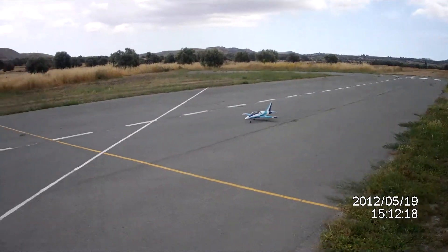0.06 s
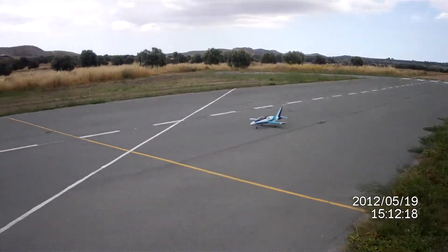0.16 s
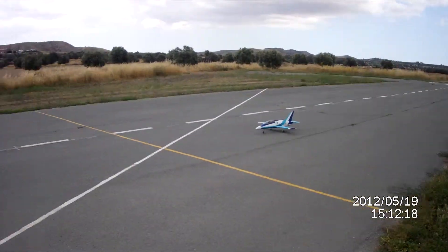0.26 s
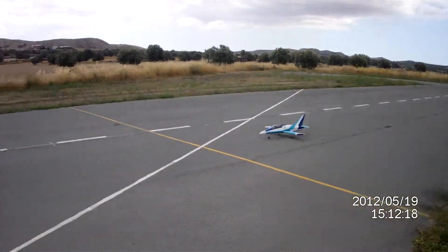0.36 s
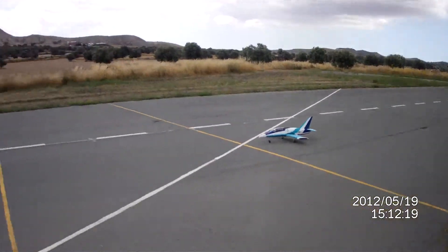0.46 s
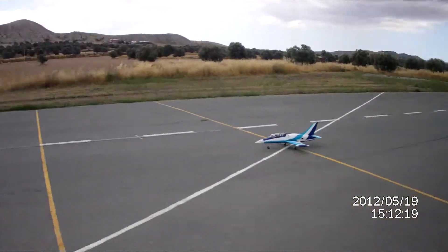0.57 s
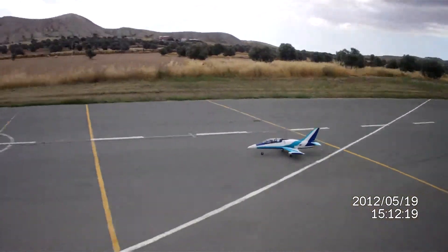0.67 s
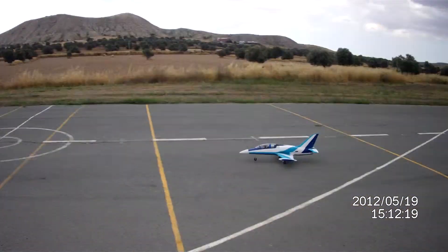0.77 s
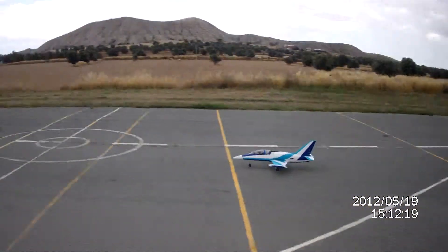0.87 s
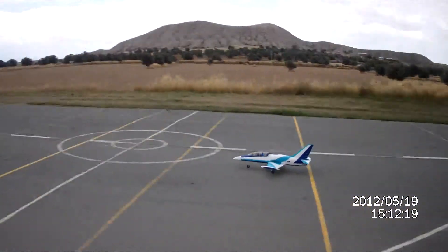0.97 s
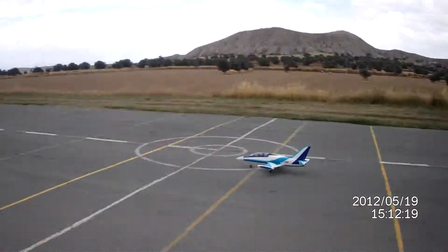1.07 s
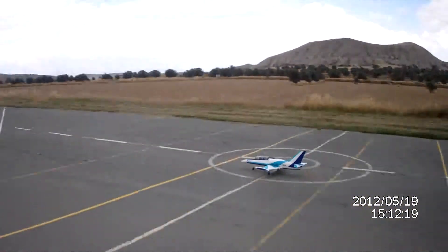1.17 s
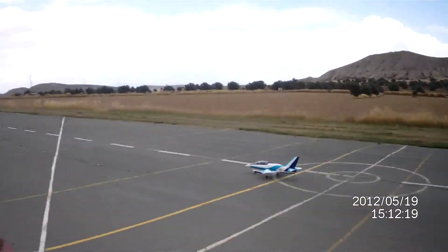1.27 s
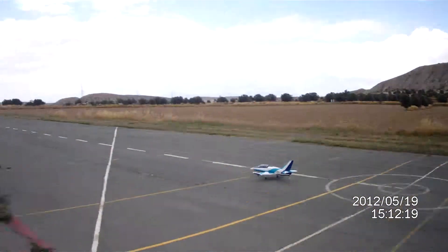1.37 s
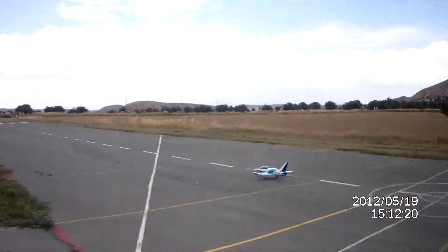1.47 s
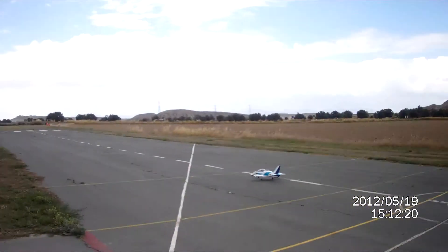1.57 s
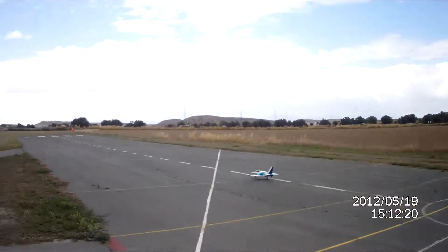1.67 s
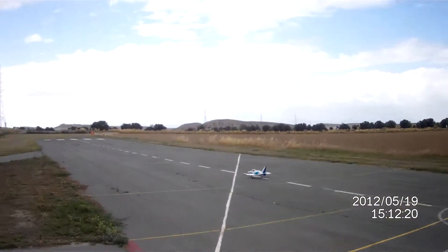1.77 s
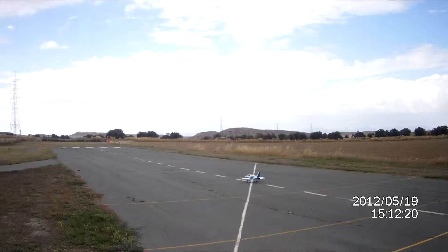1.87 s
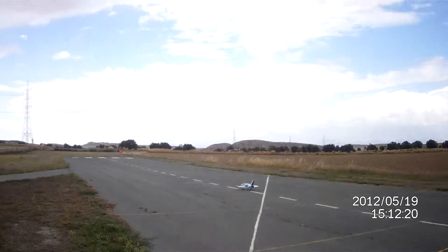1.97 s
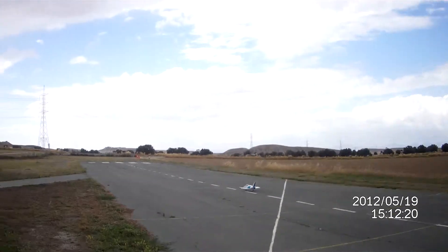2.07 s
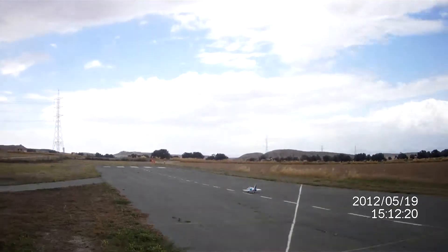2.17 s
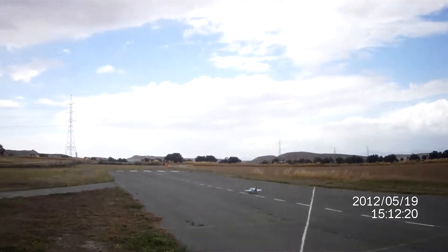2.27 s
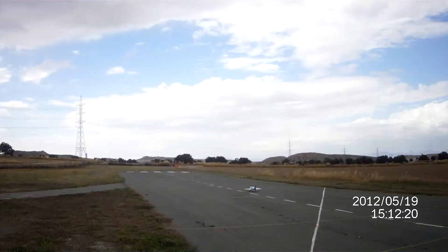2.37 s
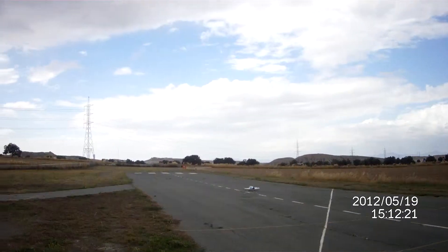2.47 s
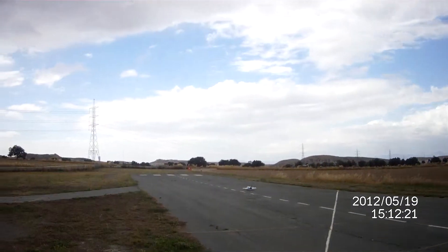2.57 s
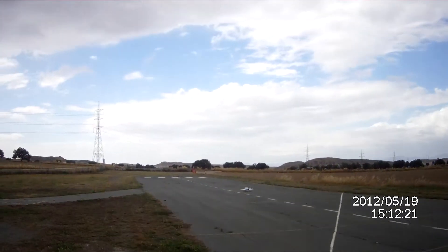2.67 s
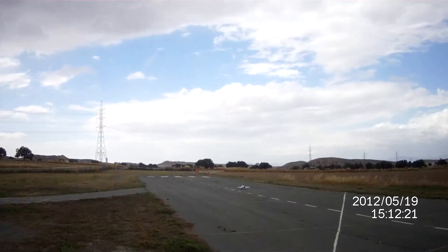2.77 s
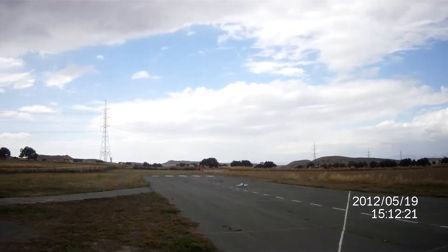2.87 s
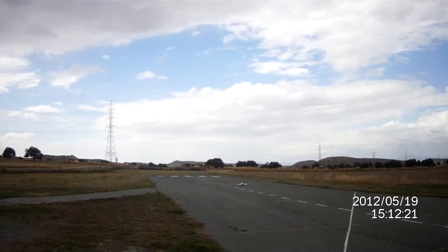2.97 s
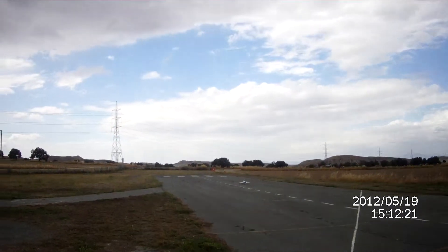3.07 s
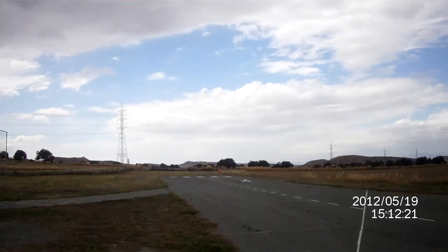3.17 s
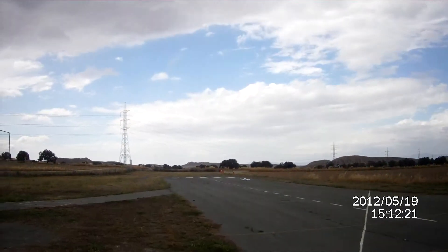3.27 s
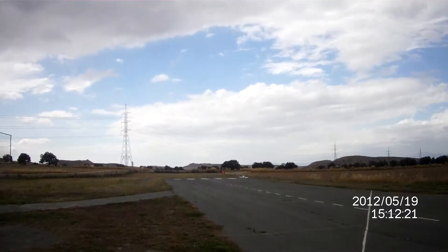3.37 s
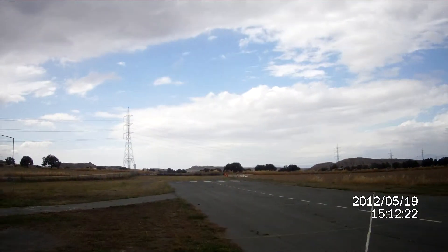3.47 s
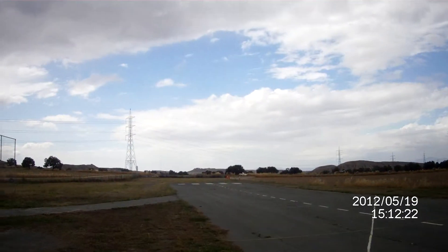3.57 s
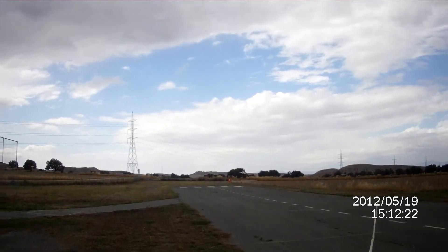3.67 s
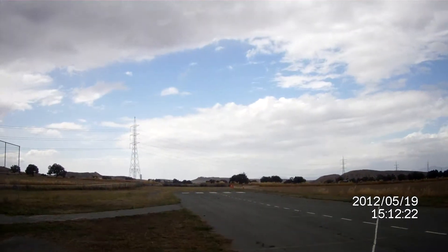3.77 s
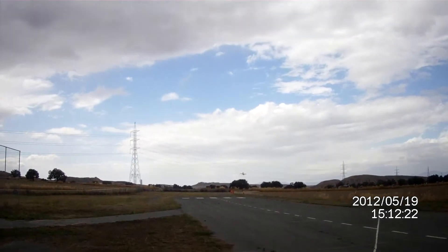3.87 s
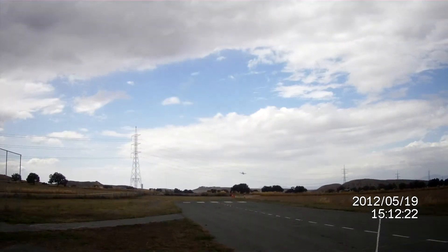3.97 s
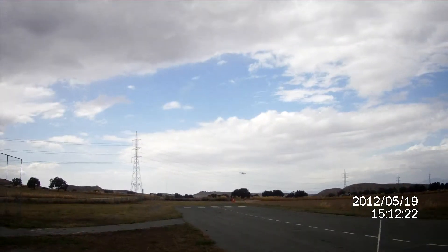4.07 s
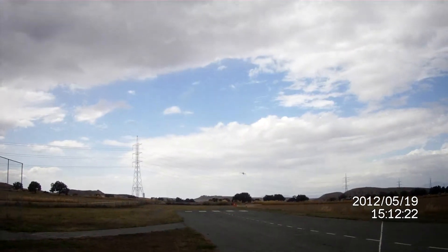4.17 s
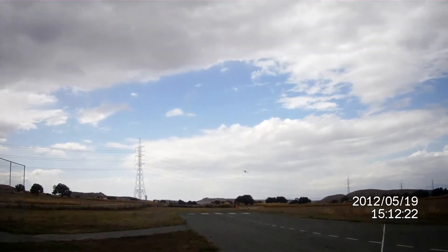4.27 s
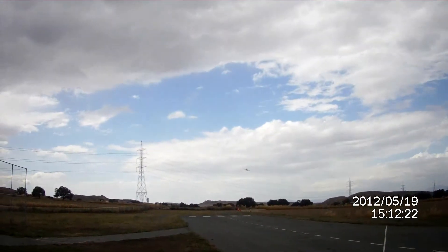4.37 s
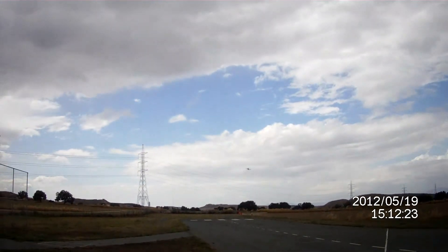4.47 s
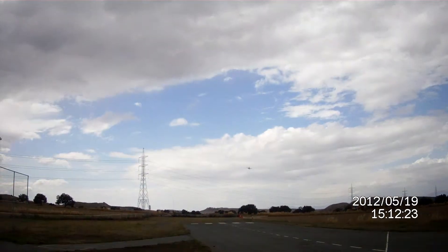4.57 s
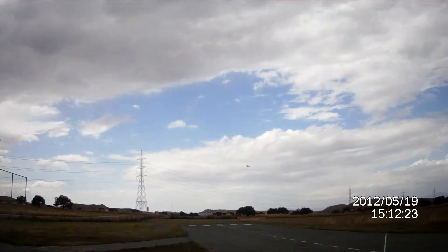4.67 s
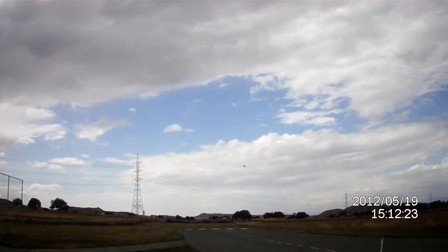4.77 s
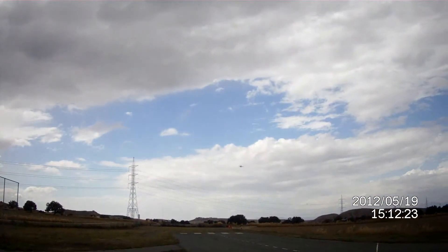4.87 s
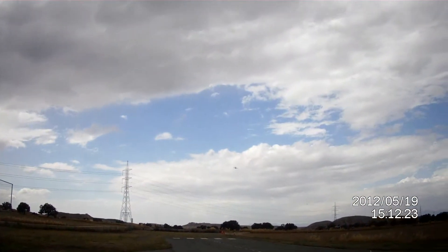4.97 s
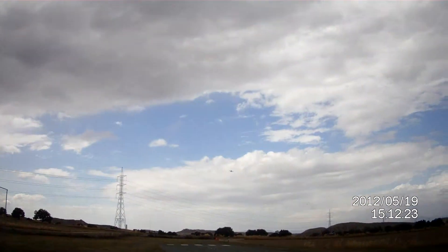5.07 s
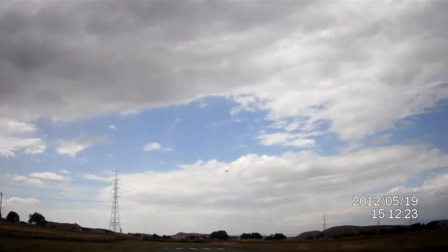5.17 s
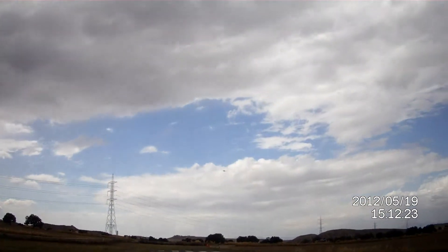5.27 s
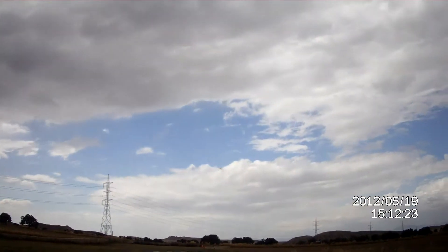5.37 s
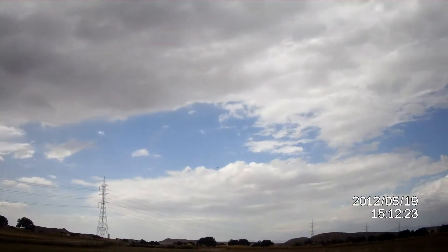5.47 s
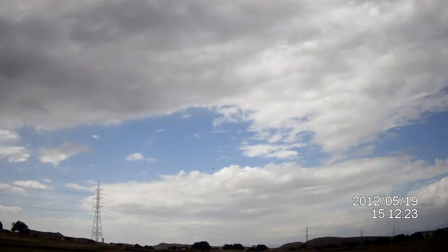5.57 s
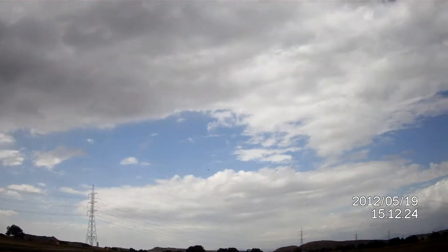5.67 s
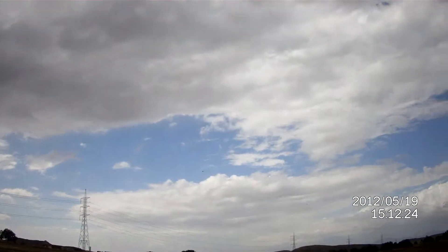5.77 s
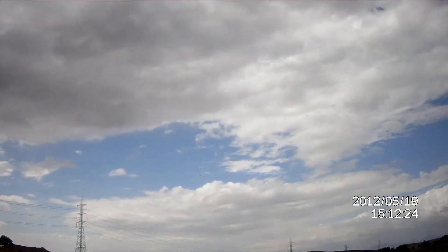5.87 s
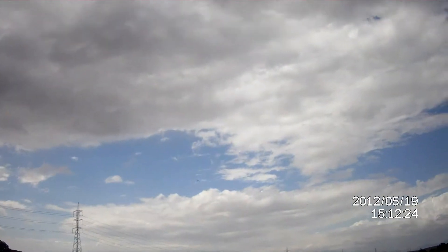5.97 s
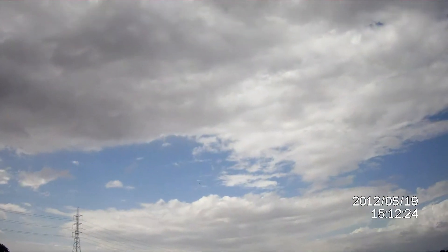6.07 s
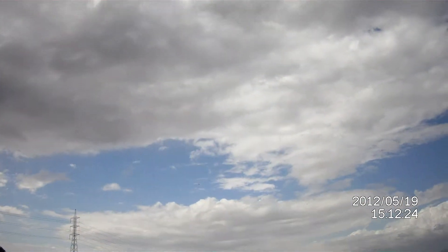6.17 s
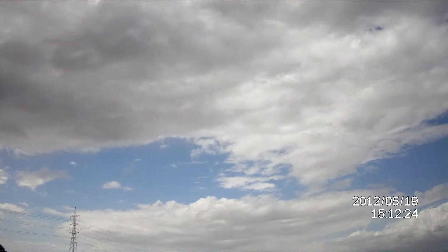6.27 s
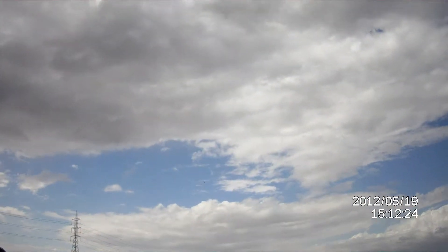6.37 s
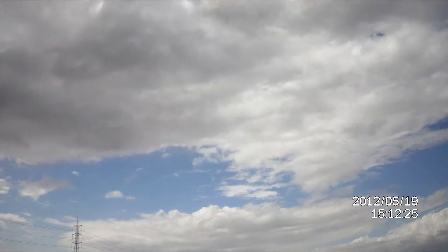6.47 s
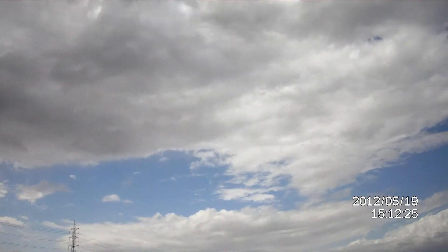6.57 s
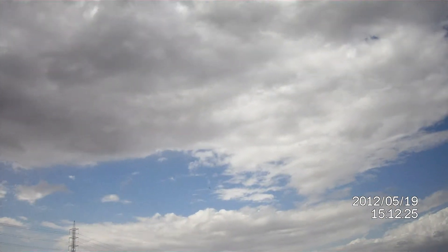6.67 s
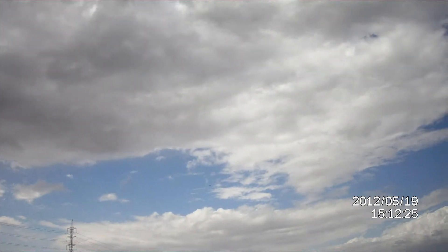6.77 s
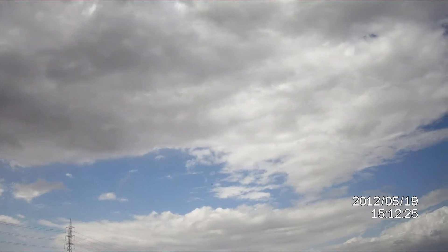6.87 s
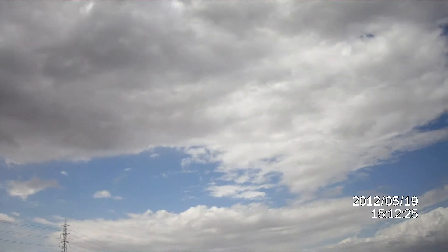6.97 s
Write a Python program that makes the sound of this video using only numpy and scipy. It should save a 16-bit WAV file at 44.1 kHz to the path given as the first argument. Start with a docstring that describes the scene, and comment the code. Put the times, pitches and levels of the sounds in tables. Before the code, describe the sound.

Outdoors on an open airfield, a shrill multi-toned fan whistle over breathy exhaust roar spools up and passes near the microphone around one second. Two small wheel clicks follow just before two seconds. The jet recedes, its treble hissing and flickering, then climbs away as a thin, wavering whine. Mono hand-held sound, with faint camera flutter and dull scuffs late on.

```python
"""Model jet take-off

A model jet with a five-blade electric ducted fan spools up, rolls past on tarmac, lifts off and climbs away.
Shaft-locked tones and shaped noise leave the duct in beams that sweep past as the flight angle changes.
A delayed copy off the ground combs the sound, lagging more with height; the side of the field echoes faintly.
The hand-held mono camera ticks faintly once per frame and is bumped a few times; knocks are noise bursts."""
import sys
import numpy as np
from scipy import signal
from scipy.fft import rfft, irfft, next_fast_len
from scipy.io import wavfile
from scipy.ndimage import uniform_filter1d, map_coordinates

SR = 44100
rng = np.random.default_rng(int(sys.argv[2]) if len(sys.argv) > 2 else 0)


def output_pcm(signal):
    """Save a mono or channel-first signal as 16-bit PCM at the path in sys.argv[1].

    Samples are clipped to [-1, 1] before scaling.
    """
    pcm = np.clip(np.atleast_2d(signal).T, -1, 1) * 32767
    wavfile.write(sys.argv[1], SR, np.round(pcm).astype(np.int16))


N = 309582

# Fan speed as heard, Doppler shift included: time_s, shaft_hz
FAN_SPEED = [(0, 731), (0.2, 730), (0.3, 737.6), (0.4, 758), (0.44, 776), (0.5, 839), (0.55, 905),
             (0.59, 916.2), (0.75, 912), (1, 900), (1.17, 890), (1.56, 874.8), (1.8, 869), (2.3, 859.8),
             (3.15, 851.5), (3.6, 848.3), (5.4, 844.4), (7.02, 846.3)]
# Lines from unequal blades, before the duct rush beam: shaft_multiple, level_db
UNEVEN_BLADES = [(2, -22), (3, -13.5), (4, -20.5), (6, -21.5), (7, -43), (8, -16.5), (9, -21), (11, -38),
                 (12, -42), (20, -6)]
# Noise spectra, scaled to rms 1 in use: freq_hz, relative_level_db
# exhaust roar
ROAR_SPECTRUM = [(100, -35), (200, -21), (330, -19.5), (440, -8.5), (600, 0.5), (760, 1), (950, -5),
                 (1150, -13), (1600, -22.5), (2200, -29), (4000, -39)]
# deep part of the exhaust, heard only close by
NEAR_ROAR_SPECTRUM = [(130, -35), (240, -5.5), (350, -8.5), (520, 0), (700, 0.5), (1000, -46),
                      (1400, -11.5), (2200, -25.5)]
# rush in the duct
RUSH_SPECTRUM = [(700, -10.5), (1300, -4), (1800, -7.5), (2150, -5), (2600, 2), (3150, 0.5), (3700, -11),
                 (4350, -2.5), (4900, -13), (5600, -7), (6300, -14.5), (7500, -21), (12000, -44)]
# turbulence around the blade tone
TURBULENCE_SPECTRUM = [(3000, -21), (3800, -4.5), (4100, -7.5), (4400, -1), (4720, -0.5), (5050, -2.5),
                       (5300, -7), (5580, -3.5), (5900, -13), (6500, -21.5)]
# hiss from the blade tips
HISS_SPECTRUM = [(4000, -31), (6400, -9.5), (7000, -4.5), (7700, -2.5), (8500, 2), (9100, -1), (9800, -1.5),
                 (10500, -16), (12000, -17)]
# top fizz from the blade tips
FIZZ_SPECTRUM = [(9000, -31), (10400, -4), (11000, 4), (11600, 2), (12400, 2), (13100, -1.5), (13600, 0.5),
                 (14200, -13), (15200, -6)]
# open field
FIELD_SPECTRUM = [(25, -1.5), (55, -5.5), (100, -2.5), (160, -7.5), (300, -11.5), (470, -14.5),
                  (800, -11.5), (1300, -16.5), (3000, -24.5), (6000, -33), (12000, -48), (15000, -38)]
# scuffed camera body
BODY_SPECTRUM = [(100, -1), (350, -1), (650, 8), (1200, -6.5), (2200, -4.5), (3000, -40), (10000, -43)]

# Beams by angle from the tail (0) to the nose (180), at full fan speed and passing distance.
# Blade-passing tone, narrow lobes: angle_deg, half_width_deg, level_db
BLADE_TONE_LOBES = [(132, 4.8, -31.5), (125.65, 1.94, -26), (121.6, 2.5, -20.5), (115.6, 4.84, -13),
                    (109.1, 4.2, -20.5), (99.6, 6.5, -13), (90.9, 3.07, -21), (81.96, 6.34, -12.5),
                    (72.7, 6.1, -23.5), (64.54, 5.8, -14), (51.36, 8.9, -17.5), (36.25, 8.2, -25),
                    (23.6, 6.6, -32.5), (14.75, 5.7, -22), (7.017, 7, -22.5)]
# Rotor imbalance tone: angle_deg, level_db
IMBALANCE_BEAM = [(2.5, -31), (3, -32), (3.3, -28.5), (5, -39), (14, -30), (35, -23), (54, -21), (90, -33),
                  (120, -31.5), (128, -21), (133, -23), (136, -27.5)]
# Blade tone, second harmonic, before air loss: angle_deg, level_db
BLADE_SECOND_BEAM = [(2.5, -27), (4, -25), (6, -18), (7.2, -18.5), (8.3, -32), (10.7, -24.5), (13.5, -39),
                     (16, -28.5), (20, -24), (22, -33), (25, -18), (38, -21), (50, -27.5), (78, -32),
                     (100, -40), (115, -29), (122, -32), (127, -26), (136, -32.5)]
# Blade tone, third harmonic, before air loss: angle_deg, level_db
BLADE_THIRD_BEAM = [(2.5, -52), (5, -35), (8, -42), (10.5, -27), (14, -34), (18, -22), (23.5, -21),
                    (30, -42), (42, -24.5), (70, -32), (95, -26), (127, -28.5), (136, -41)]
# Air noise, before trims and air loss: angle_deg, roar_db, rush_db, turbulence_db, hiss_db, fizz_db
AIR_NOISE_BEAMS = [(2.5, -27.5, -38, -27.5, -37.5, -32), (3.48, -29.5, -30, -33.5, -34.5, -34.5),
                   (4.4, -29.5, -33, -34.5, -39.5, -37.5), (5.36, -31, -30, -31, -33.5, -36.5),
                   (8.904, -29, -30, -32.5, -35, -37), (15.1, -29, -31.5, -31.5, -36.5, -34),
                   (18.1, -30.5, -32, -40, -35.5, -25), (23.7, -28.5, -31, -43.5, -30, -24),
                   (34.3, -32, -32.5, -39, -27, -28.5), (40.7, -33, -40.5, -29, -27, -32.5),
                   (62, -32.5, -39, -27.5, -34, -36), (82, -33.5, -39, -28, -38, -39),
                   (103, -32, -41.5, -29.5, -37.5, -38), (122, -31, -39, -31, -37, -37.5),
                   (131.5, -29.5, -39.5, -31, -38, -34.5), (135.8, -35.5, -34.5, -46, -41.5, -36)]

# Slow waver of the whine: time_s, gain_db
WHINE_WAVER = [(2.5, 0.5), (3.45, 1.5), (3.8, -6.5), (4.1, 0), (4.4, -1), (4.85, -5), (5.15, -3.5),
               (5.52, 4), (5.85, -2), (6.3, 2.5), (7.02, 0)]
# Mean lag of the ground reflection through lift-off and climb: time_s, lag_ms
GROUND_LAG = [(0, 0), (3.3, .005), (3.47, .025), (3.58, .12), (3.98, .59), (4.22, .826), (4.49, 1.062),
              (5.11, 1.534), (5.37, 1.76), (5.82, 2.02), (6.15, 2.35), (7.02, 2.71)]
# Reflection from the side of the field: time_s, level_db
SIDE_ECHO_LEVEL = [(0, -90), (1.7, -48), (2.2, -55.5), (3, -52), (3.42, -50), (3.7, -66), (4.5, -82),
                   (7.02, -86)]
# Microphone port, dips and one peak: centre_hz, width_hz, gain_db
PORT_RESPONSE = [(3750, 126, -6.5), (5350, 75, -2.5), (6420, 250, -2), (10250, 279, 2.5), (12260, 230, -10)]
# Soft thump at the camera, two wheel clicks, tiny tick: start_s, level_db, centre_hz, width_hz, t60_s
KNOCKS = [(0.319, -40, 100, 100, 0.17), (1.8264, -23.5, 1803, 2200, 0.018),
          (1.8924, -26.5, 1500, 1989, 0.011), (6.396, -38, 12300, 2400, .006)]
# Scuffs on the camera body: start_s, level_db, t60_s
BODY_SCUFFS = [(4.671, -47, 0.22), (6.049, -39, 0.096), (6.078, -45.5, 0.22)]

# Take-off run: brakes off ROLLING_S before the start, speed closes in on TOP_M_PER_S
ROLLING_S, TOP_M_PER_S, SPEED_UP_S = 0.079, 24.9, 1.846
PASS_S, PASS_M = 0.92, 5.527  # closest approach
FULL_HZ, THRUST_POWER = 905, 3  # sound pressure grows as this power of fan speed
ABSORB_DB_PER_M = 0.0528  # air loss at 10 kHz
NEAR_DB, NEAR_SOAK_DB_PER_M = -33, 0.66  # near roar at zero distance; ground soak
OVERTONE_DB = -29  # octave of the imbalance tone, against it
SIDE_LINE_DB = -49.5  # third shaft multiple, spreading evenly
FRAME_HZ, TOP_HZ = 29.97, 15300  # camera frame rate and band limit


def amp(db):
    """Decibels to gain."""
    return 10 ** (np.asarray(db) / 20)


def unit(x):
    """Scale to rms 1."""
    return x / np.sqrt(np.mean(x ** 2) + 1e-20)


def curves(rows):
    """One value per sample for each column after the time."""
    time_s, *columns = np.transpose(rows)
    return [np.interp(np.arange(N) / SR, time_s, column) for column in columns]


def beams(rows, angle_deg):
    """Level in dB towards the listener for each column after the angle."""
    degrees, *columns = np.transpose(rows)
    return [np.interp(angle_deg, degrees, column) for column in columns]


def wobble(rate_hz):
    """Smooth random curve, rate_hz knots a second."""
    knots = rng.standard_normal(int(N * rate_hz / SR) + 4)
    return map_coordinates(knots, [np.arange(N) * rate_hz / SR], order=2)


def filtered(x, response):
    """Apply a frequency response to x."""
    size = next_fast_len(N + SR // 2)
    return irfft(rfft(x, size) * response(np.fft.rfftfreq(size, 1 / SR)), size)[:N]


def noise(spectrum, patchy_db):
    """Noise of rms 1, shaped by the spectrum, with drifting patches of random gain."""
    grid = signal.stft(rng.standard_normal(N), nperseg=512)[2]
    patches = uniform_filter1d(rng.standard_normal(grid.shape), size=5, axis=0)
    patches = uniform_filter1d(patches, size=18, axis=1)
    patchy = signal.istft(grid * amp(patchy_db * unit(patches)), nperseg=512)[1][:N]
    freq_hz, level_db = np.transpose(spectrum)
    log_hz = np.log(freq_hz)
    return unit(filtered(patchy, lambda hz: amp(np.interp(np.log(hz + 1), log_hz, level_db))))


def jet():
    """Fan speed sets pitch and strength; the flight sets spreading and which beams reach the listener."""
    speed_hz = uniform_filter1d(curves(FAN_SPEED)[0], size=700, mode="nearest")
    turns = np.cumsum(speed_hz) / SR
    distance_m, angle_deg = flight()
    gain = (speed_hz / FULL_HZ) ** THRUST_POWER * PASS_M / distance_m
    tones = gain * amp(curves(WHINE_WAVER)[0]) * whine(turns, distance_m, angle_deg)
    air = gain * airflow(distance_m, angle_deg)
    tones = over_ground(tones, share=0.72, weak_lag_ms=1.86, scatter_hz=8900, uneven_ms=0.004)
    air = over_ground(air, share=0.51, weak_lag_ms=4.0, scatter_hz=6700, uneven_ms=0.021)
    return tones + air + side_echo(turns)


def flight():
    """Distance (m) and angle off the tail (deg) of a jet that speeds up along a straight line."""
    def run_m(s):
        return TOP_M_PER_S * (s + SPEED_UP_S * np.exp(-(s + ROLLING_S) / SPEED_UP_S))

    past_m = run_m(np.arange(N) / SR) - run_m(PASS_S)
    return np.hypot(past_m, PASS_M), np.degrees(np.arctan2(PASS_M, past_m))


def absorbed(distance_m, hz):
    """Decibels lost in the air, growing with the square of frequency."""
    return ABSORB_DB_PER_M * distance_m * (hz / 10000) ** 2


def partial(turns, order, scatter, fade_hz):
    """One shaft multiple; a share scattered by moving air beats with the direct tone."""
    stray = [wobble(fade_hz) + 0.38 * wobble(4 * fade_hz) for part in range(2)]
    gain = 1 + scatter * (stray[0] + 1j * stray[1])
    phase = 2 * np.pi * (order * turns + rng.random())
    return unit(np.real(gain * np.exp(1j * phase)))


def lobes(angle_deg):
    """Gain of the blade tone as its lobes sweep over the listener, summed in power."""
    power = np.zeros(N)
    for centre_deg, half_width_deg, level_db in BLADE_TONE_LOBES:
        offset = (angle_deg - centre_deg) / half_width_deg
        inside = np.abs(offset) < 1
        power[inside] += (amp(level_db) * np.cos(np.pi / 2 * offset[inside])) ** 2
    return np.sqrt(power)


def whine(turns, distance_m, angle_deg):
    """The rotor's imbalance and blade tones, all locked to one shaft."""
    imbalance = partial(turns, order=1, scatter=0.08, fade_hz=30)
    imbalance += amp(OVERTONE_DB) * partial(turns, order=2, scatter=0.22, fade_hz=30)
    tones = amp(beams(IMBALANCE_BEAM, angle_deg)[0]) * imbalance
    tones += amp(SIDE_LINE_DB) * partial(turns, order=3, scatter=0.38, fade_hz=33)
    tones += lobes(angle_deg) * partial(turns, order=5, scatter=0.1, fade_hz=31)
    second_db = beams(BLADE_SECOND_BEAM, angle_deg)[0] - absorbed(distance_m, hz=8400)
    tones += amp(second_db) * partial(turns, order=10, scatter=0.35, fade_hz=32)
    third_db = beams(BLADE_THIRD_BEAM, angle_deg)[0] - absorbed(distance_m, hz=12700)
    tones += amp(third_db) * partial(turns, order=15, scatter=0.54, fade_hz=38)
    weak = np.zeros(N)
    for order, level_db in UNEVEN_BLADES:
        weak += amp(level_db) * partial(turns, order, scatter=0.62, fade_hz=21)
    # eddies drawn into the fan smear the third multiple into a narrow band
    weak += amp(-10.5) * partial(turns, order=3, scatter=1.3, fade_hz=170)
    rush_db = beams(AIR_NOISE_BEAMS, angle_deg)[1]
    return tones + amp(rush_db) * weak


def airflow(distance_m, angle_deg):
    """Exhaust roar, rush in the duct, turbulence around the blade tone, hiss and fizz from the tips."""
    roar_db, rush_db, turbulence_db, hiss_db, fizz_db = beams(AIR_NOISE_BEAMS, angle_deg)
    near_db = NEAR_DB - NEAR_SOAK_DB_PER_M * distance_m
    shimmer_db = 0.76 * wobble(26)  # restless air makes the short waves flicker together
    hiss_db = hiss_db + 2 + shimmer_db - absorbed(distance_m, hz=8500)
    fizz_db = fizz_db + 2.5 + shimmer_db - absorbed(distance_m, hz=12000)
    air = amp(roar_db - 1.5) * noise(ROAR_SPECTRUM, patchy_db=1.5)
    air += amp(near_db) * noise(NEAR_ROAR_SPECTRUM, patchy_db=1.0)
    air += amp(rush_db - 0.24) * noise(RUSH_SPECTRUM, patchy_db=1.0)
    air += amp(turbulence_db - 2.0) * noise(TURBULENCE_SPECTRUM, patchy_db=1.9)
    air += amp(hiss_db) * noise(HISS_SPECTRUM, patchy_db=3.6)
    air += amp(fizz_db) * noise(FIZZ_SPECTRUM, patchy_db=1.5)
    return filtered(air, port)


def port(hz):
    """Dips and one peak of the microphone opening, Gaussian in frequency."""
    return amp(sum(db * np.exp(-((hz - centre) / width) ** 2) for centre, width, db in PORT_RESPONSE))


def open_field():
    """Steady background of the open field: patchy noise, strongest in the bass."""
    return amp(-56.0) * noise(FIELD_SPECTRUM, patchy_db=1.5)


def frame_ticks(lead_s=0.0011, width_s=0.00689, highpass_hz=75, lowpass_hz=520, block_db=-38):
    jitter_s = 0.00028 * wobble(60)
    frames = (np.arange(N) / SR + lead_s + jitter_s) * FRAME_HZ
    block = (frames % 1 < width_s * FRAME_HZ) * amp(0.76 * wobble(30))

    def leak(hz):
        return 1j * hz / (highpass_hz + 1j * hz) / (1 + 1j * hz / lowpass_hz)

    return amp(block_db) * filtered(block, leak)


def struck(start_s, level_db, t60_s, rise_s):
    """Envelope of an impact: linear rise times exponential decay."""
    since_s = np.arange(N) / SR - start_s
    rise = np.clip(since_s / rise_s, 0, 1)
    return rise * amp(level_db - 60 * np.abs(since_s) / t60_s)


def clicks():
    """Brief knocks, each a decaying noise burst in its own Gaussian band."""
    out = np.zeros(N)
    for start_s, level_db, centre_hz, width_hz, t60_s in KNOCKS:
        hit = rng.standard_normal(N)
        band = unit(filtered(hit, lambda hz: np.exp(-((hz - centre_hz) / width_hz) ** 2)))
        out += struck(start_s, level_db, t60_s, rise_s=0.00048) * band
    return out


def side_echo(turns):
    """Two strong tones return from the side of the field with less Doppler shift, slightly sharp."""
    side_turns = 1.0225 * turns
    echo = partial(side_turns, order=1, scatter=0.33, fade_hz=14)
    echo += amp(-2) * partial(side_turns, order=5, scatter=1.9, fade_hz=78)
    return amp(curves(SIDE_ECHO_LEVEL)[0]) * echo


def over_ground(x, share, weak_lag_ms, scatter_hz, uneven_ms):
    """A late copy off the ground combs the sound; the teeth slide down as the jet climbs."""
    lag_ms = curves(GROUND_LAG)[0]
    strength = share / (1 + (lag_ms / weak_lag_ms) ** 6)  # steeper rays reflect less
    lag_ms = lag_ms + uneven_ms * np.tanh(lag_ms) * wobble(14)
    mirrored = filtered(x, lambda hz: 1 / (1 + (hz / scatter_hz) ** 4))  # grass scatters the treble
    late = map_coordinates(mirrored, [np.arange(N) - lag_ms * SR / 1000])
    return (x + strength * late) / (1 + share)


def bumps():
    """Short dull scuffs in the camera body: decaying bursts of one body-shaped noise."""
    level = sum(struck(start_s, db, t60_s, rise_s=0.00084) for start_s, db, t60_s in BODY_SCUFFS)
    return level * noise(BODY_SPECTRUM, patchy_db=0)


def scene():
    """Jet, open field and camera noises on one microphone, sent to both channels."""
    mono = jet() + open_field() + frame_ticks() + clicks() + bumps()
    return np.array([mono, mono])


def record(dry):
    """The camera keeps nothing above its band limit."""
    return np.array([filtered(side, lambda hz: hz < TOP_HZ) for side in dry])


dry = scene()
out = record(dry)
output_pcm(out)
```